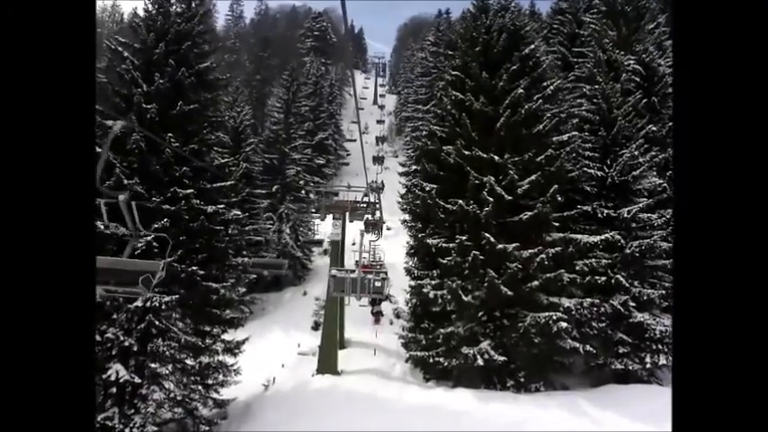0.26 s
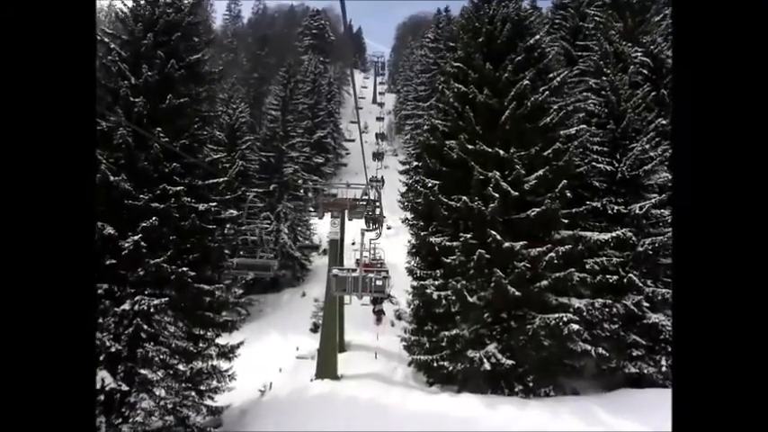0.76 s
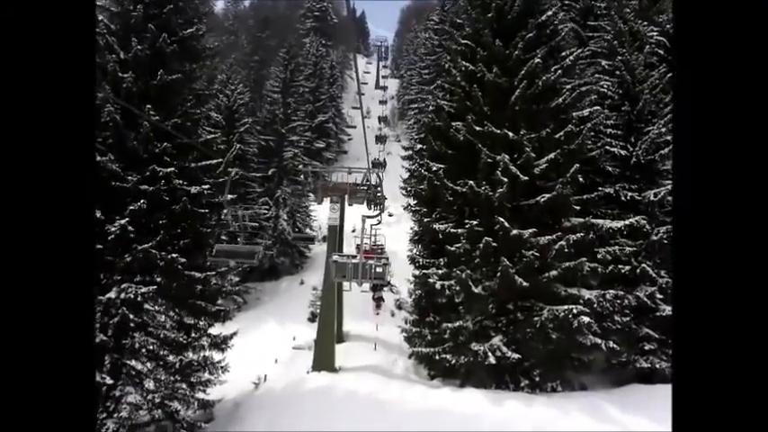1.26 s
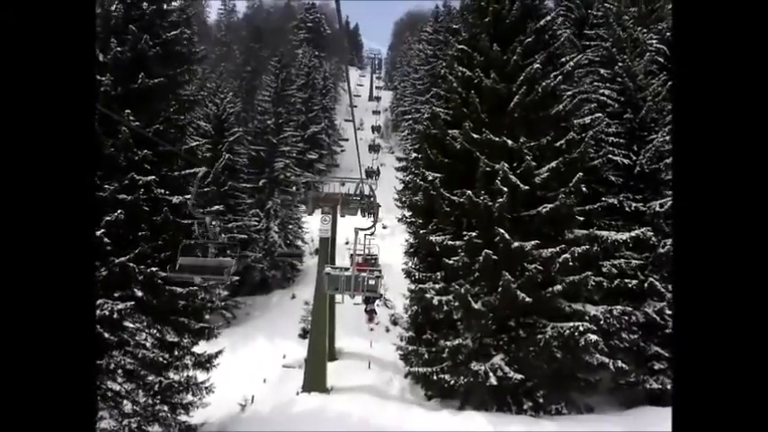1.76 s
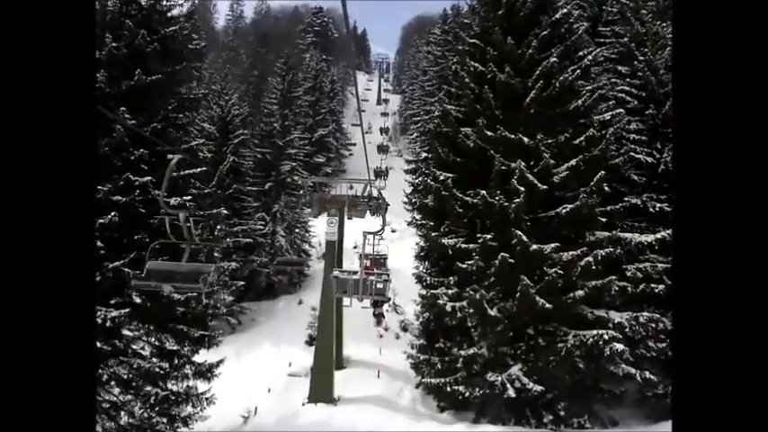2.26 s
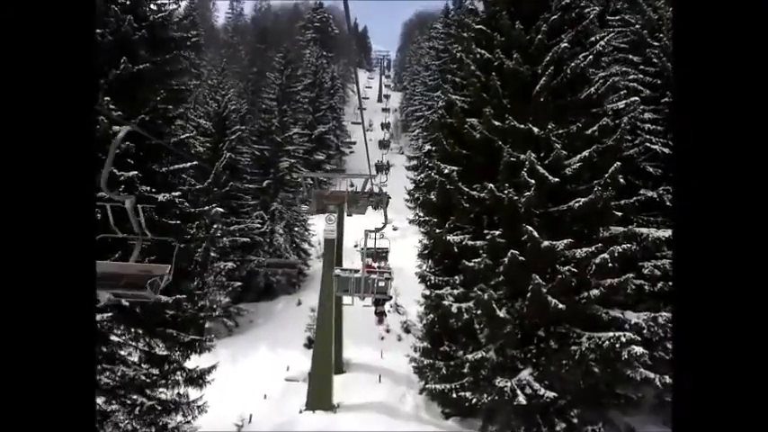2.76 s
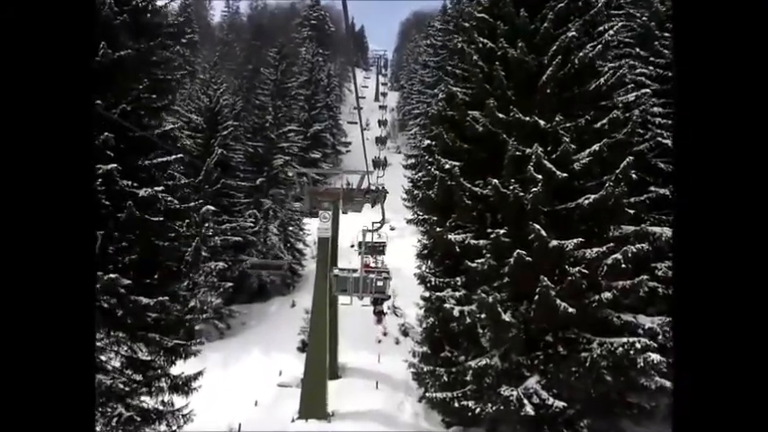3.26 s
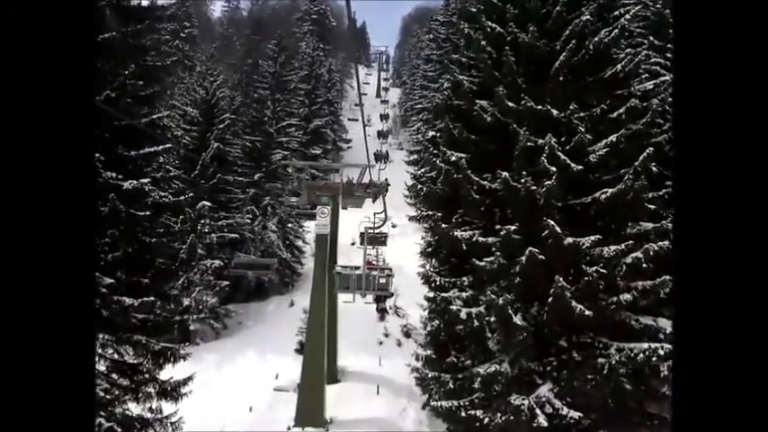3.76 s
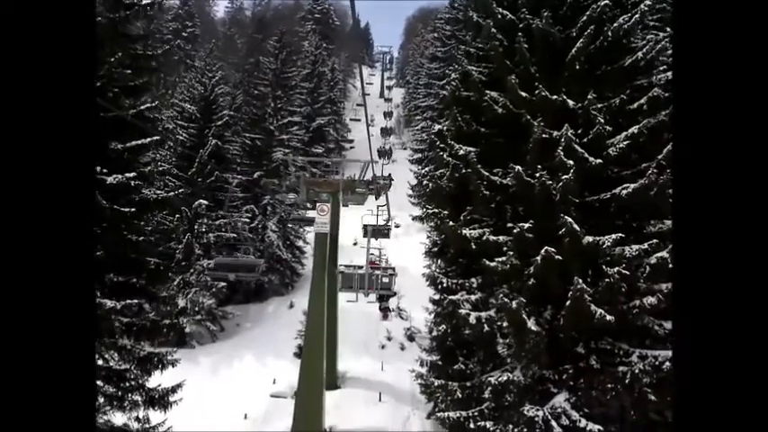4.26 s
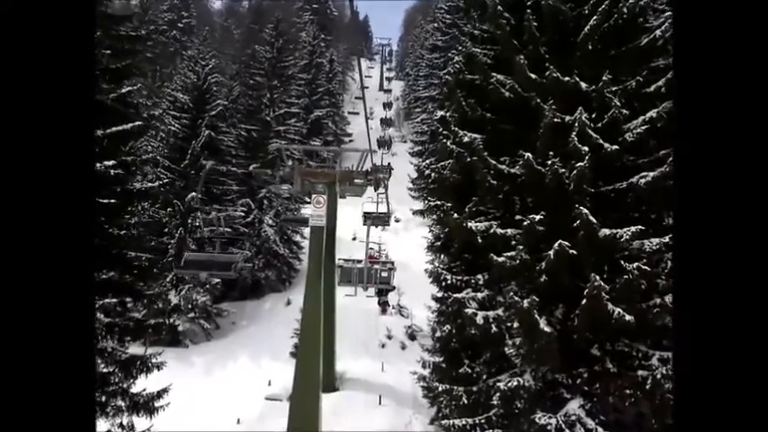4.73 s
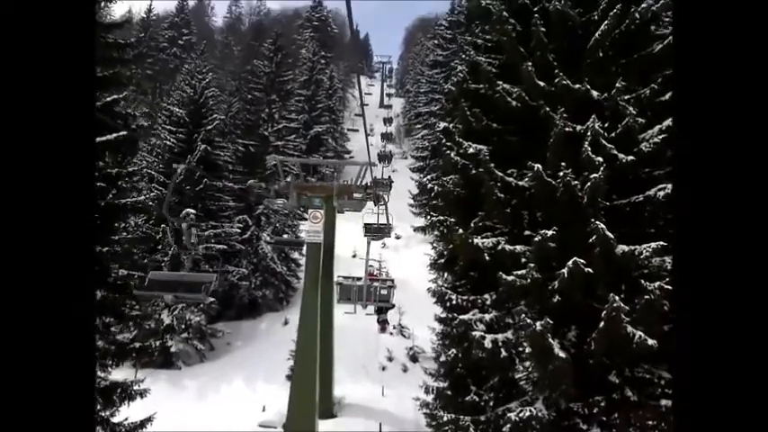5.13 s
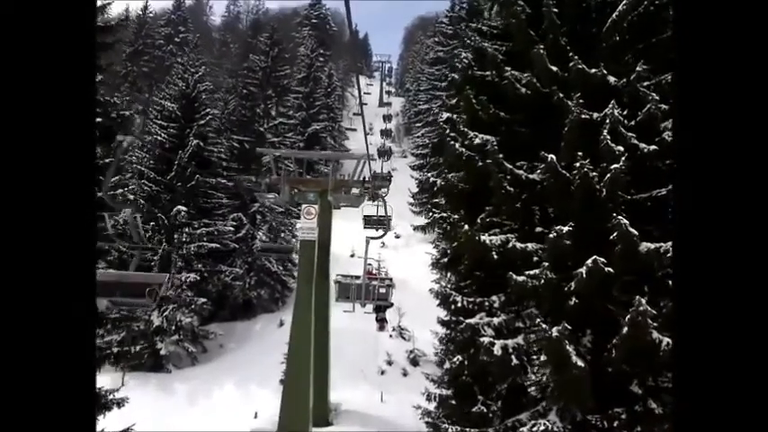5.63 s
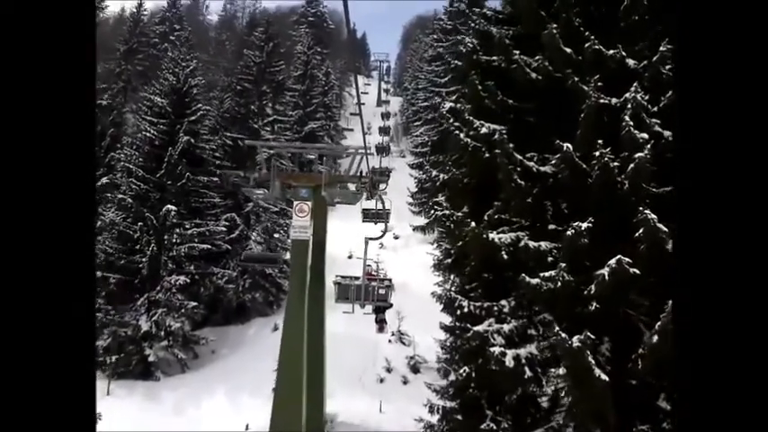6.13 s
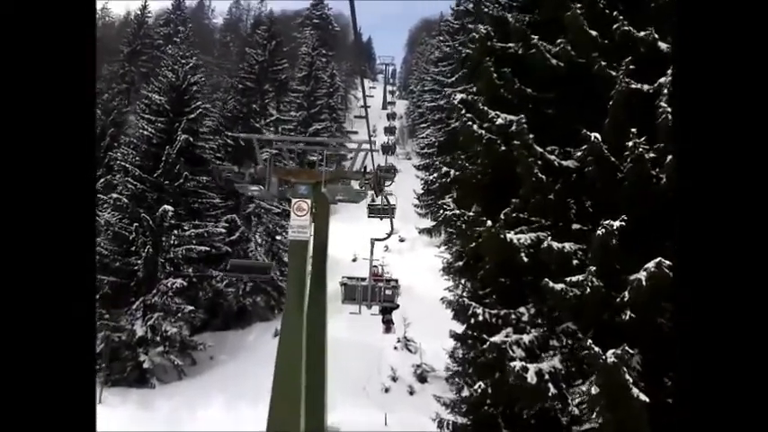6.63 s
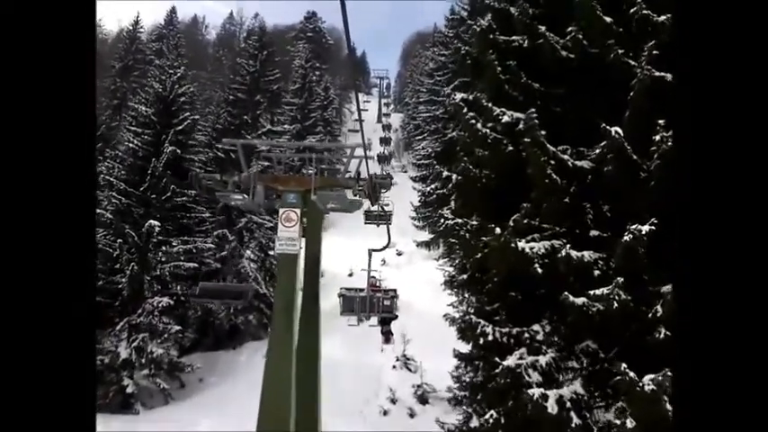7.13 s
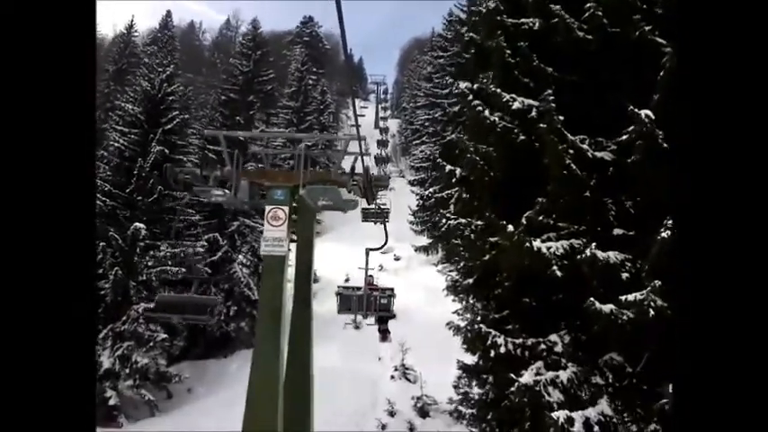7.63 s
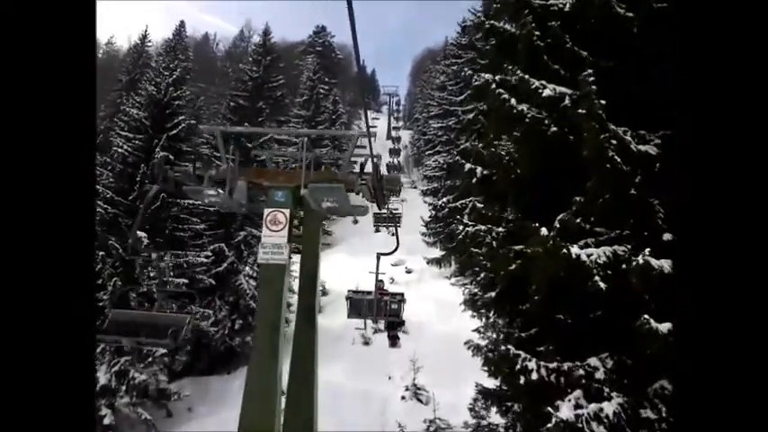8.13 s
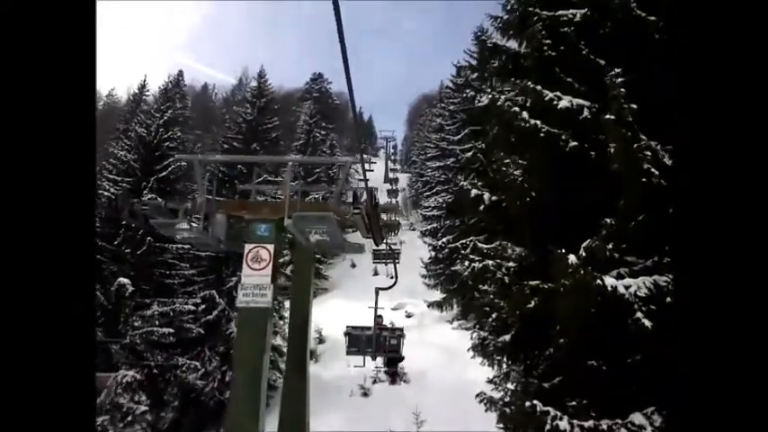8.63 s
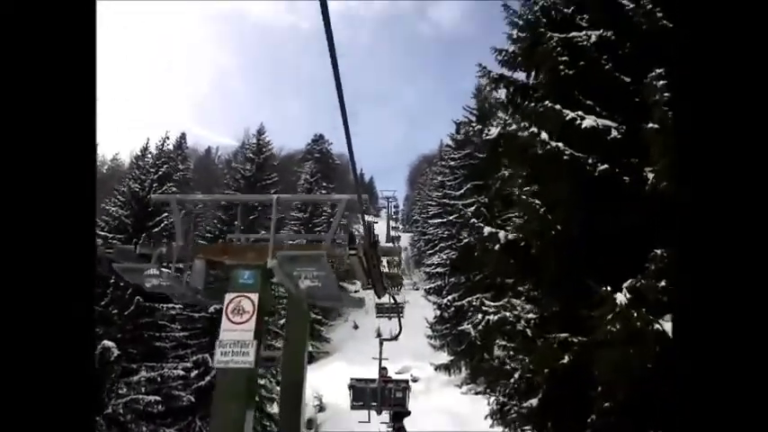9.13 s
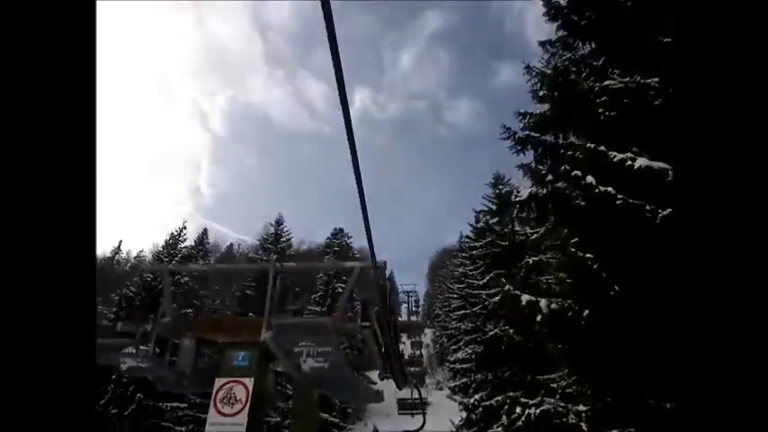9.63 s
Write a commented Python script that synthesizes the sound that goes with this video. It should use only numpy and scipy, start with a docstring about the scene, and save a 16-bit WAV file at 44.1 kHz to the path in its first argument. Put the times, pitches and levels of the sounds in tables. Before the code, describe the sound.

A chairlift ride outdoors, heard in stereo from the chair. After a quiet start, low wind rumble rises at about 0.5 seconds and loose steel parts begin knocking and chattering, four or five beats a second, slightly to the left. At 1.3 seconds a plastic catch snaps once, loud and close. A second run of clatter lasts from 2 to nearly 4 seconds, with faint, thin squeaks in both runs. Underneath, a low cable hum swells and sinks.

From 4 to 6 seconds the rattle drops away, leaving hum, rumble and a few soft thuds. At about 6 seconds, as a tower nears, the clatter returns louder and brighter, fast and even, with dull blows in the chair frame and small pings along the cable. Hum and rumble grow stronger too. The rattle thins after 9.3 seconds, while the hum and rumble carry on to about 10 seconds.

```python
"""Loose steel in a chairlift's running gear, heard from the chair in snowy forest, closing in on a tower.
The parts chatter and knock in short runs, once every turn of a sheave, and send pings along the rope.
The rope's strands drum a swelling hum through the chair, over wind and rumble. Something squeaks thinly,
and a catch snaps once, close to the stereo microphone."""
import sys
import numpy as np
from scipy import signal
from scipy.io import wavfile
from scipy.ndimage import uniform_filter1d

SR = 44100
rng = np.random.default_rng(int(sys.argv[2]) if len(sys.argv) > 2 else 0)


def to_wav(sig):
    """Store sig (one row per channel, or 1-D mono) as 16-bit WAV at the path in sys.argv[1].

    Samples outside -1..1 are clipped; the rate is SR.
    """
    pcm = np.clip(np.atleast_2d(sig), -1, 1) * 32767
    pcm = np.round(pcm).astype(np.int16)
    wavfile.write(sys.argv[1], SR, pcm.T)  # frames by channels


N = 436149

# Table levels are relative, ahead of each source's own gains.
# sheave turns that knock: (main knock [s], lead-in [dB], main [dB], rebound [dB], rebound delay [ms])
SHEAVE_TURNS = [(0.465, -54, -45, -54, 29), (0.6827, -48, -34.5, -42, 39), (0.905, -47, -41, -80, 44),
                (1.1222, -65, -34.5, -50, 54), (2.001, -55, -33, -43, 35), (2.216, -39.5, -33.5, -40.5, 61),
                (2.4349, -38, -32, -38, 25), (2.654, -39.5, -29.5, -38.5, 32), (2.873, -38, -35, -32.5, 30),
                (3.087, -34, -42, -39.5, 31), (6.1774, -36.5, -26, -23.5, 34.6),
                (6.4024, -34, -22.5, -22.5, 35.5), (6.626, -25.5, -18.5, -27, 28),
                (6.8473, -25, -19, -31, 30.4), (7.0688, -29, -21, -26, 31), (7.2902, -26, -20.5, -26.5, 30),
                (7.511, -35, -26.5, -33.5, 37), (7.7339, -31, -23, -36, 42),
                (7.955, -28, -25.5, -27.5, 37.5), (8.1755, -26, -24, -35, 30),
                (8.399, -24.5, -24.5, -35, 29), (8.62, -26.5, -24, -35, 30.5),
                (8.84, -28.5, -23.5, -28, 31), (9.056, -24, -19.5, -26, 34), (9.276, -26.5, -30, -41, 34)]
# larger, lower parts lead at first, small ones near the tower:
# (time [s], tilt of the middle modes [dB per octave], level of the part near 5.9 kHz [dB])
PART_BALANCE = [(3.9, -10, -8), (5.8, -10.5, -11), (6.2, -8, 1.5), (8.6, 1, 5), (9.1, 0.5, -7)]
# rope hum: (time [s], fundamental [dB], overtones [dB], swell swing [dB]; negative swells off the beat)
HUM_LEVELS = [(0.0, -94, -57, -10), (0.68, -59, -71, 10), (1.62, -44.5, -46, 0.5), (2.27, -37, -76.5, 3.5),
              (3.0, -61, -53, 15.5), (3.63, -40.5, -48, 2), (4.9, -41, -44, 8), (5.6, -42, -44.5, 6.5),
              (6.15, -45, -42.5, -5), (6.3, -29.5, -45, -8), (6.9, -30.5, -44.5, 2.5),
              (7.6, -32.5, -41, -5.5), (8.89, -32.5, -42, -2.5), (9.48, -30.5, -35.5, 6),
              (9.9, -41, -43.5, -12)]


def steel():
    """Contacts, knocks and thuds ring the same loose steel parts, each in its own direction."""
    modes = [(460, -24, 0.1), (621, -17, 0.035), (740, -19, 0.035), (1016, -16.5, 0.036), (1370, -9, 0.066),
             (1487, -9, 0.029), (1850, -12, 0.014), (2800, -9, 0.025), (3060, -3, 0.012), (3186, -3, 0.045),
             (3310, -2, 0.035), (3480, -5, 0.035), (3586, -16, 0.2), (3754, -13, 0.14), (4882, -28, 0.2),
             (3910, -4, 0.03), (4012, -4, 0.04), (4100, 2, 0.008), (4545, -5, 0.011), (4800, -9, 0.015),
             (5346, -5, 0.007), (5810, -1, 0.008), (7370, -12, 0.0072), (10200, -28, 0.024),
             (12200, -38, .01)]  # ringing parts: (frequency [Hz], level [dB], t60 [s])
    pan = [(500, 4.5), (1500, 1.5), (3500, 2.5), (5600, 11), (8000, 5.5), (12000, -9.5)]  # their place in the image: (frequency [Hz], left minus right [dB])
    thuds = [(1.108, -25), (1.85, -28.5), (2.047, -23.5), (2.267, -22.5), (2.48, -22.5), (4.058, -40),
             (4.366, -33.5), (4.438, -37.5), (4.505, -34.5), (4.57, -34), (5.489, -31), (6.139, -22.5),
             (6.276, -18.5), (7.233, -15.5)]  # dull blows in the frame: (time [s], peak [dB])
    low_drive, mid_drive, high_drive = contacts()
    thud_drive = amp(-16.5) * dying(spikes(*np.transpose(thuds)), t60=.044)
    tilt_db, near_db = in_time(PART_BALANCE)
    sizzle_db = 8 * np.exp(-((np.arange(N) / SR - 7.9) / .32) ** 2)  # the very top swells once
    roughness = rng.standard_normal(N) * amp(3.34 * drift(8.2))  # which part is struck most keeps changing
    out = np.zeros((2, N))
    for (hz, mode_db, t60), (shift, lag) in zip(modes, rng.random((len(modes), 2))):
        if hz > 4550:
            drive = high_drive
        elif hz < 2200:
            drive = low_drive + thud_drive * (600 / hz) ** 1.68
        else:
            drive = mid_drive * amp(tilt_db * np.log2(hz / 3600))
        if 5600 < hz < 6200:
            drive = drive * amp(near_db)
        if hz > 9000:
            drive = drive * amp(sizzle_db)
        ringing = amp(mode_db) * ring(drive * np.roll(roughness, int(shift * N)), hz, t60)
        out += at_ports(ringing, pan_db=at_hz(pan, hz), lag_ms=.2 * lag)
    # the pitch slides as the parts load and unload
    position = np.arange(N) + np.cumsum(.0025 * signal.detrend(drift(25)))
    out = np.array([np.interp(position, np.arange(N), port) for port in out])
    # a dip near 2.2 kHz hollows the rattle between its low and high rings
    out -= .55 * filtered(out, 1, [1900, 2600], "band")
    return filtered(out, 2, 9000)  # rounded contacts carry little top


def contacts(per_s=2500, spread_db=5):
    """Dense small contacts and crackling knocks: the force on the low, middle and high steel modes."""
    level = amp(-21.5) * chatter_level()
    s, peak_db, bright_db = knocks()
    bright = spikes(s, peak_db + bright_db + 10)
    touches = rng.random(N) < per_s * amp(4 * drift(30)) / SR
    grit = touches * amp(spread_db * np.minimum(rng.exponential(1, N), 4))
    crackle = amp(-14) * softened(dying(spikes(s, peak_db), t60=.015))
    tick = amp(-15.5) * softened(dying(bright, t60=.009))
    # small bright parts sink between knocks and shiver on after a hard one
    shiver = amp(-6 + 4 * turn_wave()) * level + amp(-46.5) * dying(bright, t60=.22)
    return grit * level + amp(-2.5) * crackle, grit * level + crackle, grit * shiver + tick


def knocks(lead_s=.037):
    """Five strikes a knocking turn, plus off-beat ones: (time [s], peak [dB], brightness [dB])."""
    offbeats = [(3.2048, -29, -27), (3.435, -35, 0.5), (3.648, -37, -35), (3.7103, -35, 0), (5.89, -36, -3),
                (6.2776, -29.5, -6), (6.972, -36.5, -25), (7.4099, -32.5, -1.5), (7.6175, -26, -8.5),
                (7.817, -41, -20), (7.835, -28, -2.5), (7.912, -34, -5), (8.036, -34, -8),
                (8.053, -24, -3.5), (8.074, -34, -5), (8.086, -27, -0.5), (8.259, -30.5, -10),
                (8.272, -27.5, -2), (8.963, -29.5, -30), (9.182, -35, -30), (9.402, -36, -32),
                (9.515, -35.5, -34), (9.713, -44, -17), (9.795, -39.5, -22)]  # knocks off the beat: (time [s], peak [dB], brightness [dB])
    # lead-in, its second strike, dull graze, main knock and rebound: (brightness [dB])
    brightness = [-12, -19.5, -11, -5, 0]
    strikes = []
    for s, lead_db, main_db, rebound_db, rebound_ms in SHEAVE_TURNS:
        times = [s - lead_s, s - lead_s + .008, s - .006, s, s + rebound_ms / 1000]
        peaks_db = [lead_db, lead_db - 2.5, lead_db - 3, main_db, rebound_db]
        strikes += zip(times, peaks_db, brightness)
    return np.transpose(strikes + offbeats)


def chatter_level():
    """Gain of the chatter: it swings once a turn, and lone swishes rise out of the lulls."""
    # loose steel: (time [s], level [dB], swing [dB]; positive peaks with the main knock)
    chatter = [(0.0, -88, 4), (0.3, -78, 4), (0.46, -48.5, -4.5), (1.25, -44.5, 0.5), (1.4, -51.5, -5),
               (1.71, -48, -2.5), (1.8, -58.5, -7), (1.89, -39.5, -0.5), (2.46, -48, 2.5),
               (3.12, -44.5, -5.5), (3.24, -31.5, 10.5), (3.36, -52, -20.5), (3.53, -60.5, 6.5),
               (3.65, -44, -8), (3.86, -48, -1), (3.98, -87, 1), (5.8, -75, 1.5), (5.87, -52.5, -8),
               (6.08, -41.5, -2.5), (6.6, -37, 2), (7.0, -47, -0.5), (7.4, -38.5, -0.5), (8.2, -36.5, 1),
               (8.7, -41.5, 4), (9.57, -42.5, -4.5), (9.7, -80, 1), (9.9, -87, 12)]
    swishes = [(4.03, -65), (4.2, -62.5), (4.85, -53.5), (5.479, -54), (9.76, -54), (9.85, -51)]  # brief flurries of chatter: (time [s], peak [dB])
    rise_db_per_s, fade_db_per_s = 167, 502
    t = np.arange(N) / SR
    level_db, swing_db = in_time(chatter)
    level = amp(level_db + swing_db * turn_wave())
    for s, peak_db in swishes:
        level += amp(peak_db - np.maximum(rise_db_per_s * (s - t), fade_db_per_s * (t - s)))
    return level


def turn_wave(turn_s=.22):
    """The sheave's rotation, as a cosine that peaks with each main knock."""
    s = np.array(SHEAVE_TURNS)[:, 0]
    s = np.r_[s[0] - 5 * turn_s, s, s[-1] + 5 * turn_s]
    turn_count = np.r_[0, np.cumsum(np.round(np.diff(s) / turn_s))]
    return np.cos(2 * np.pi * np.interp(np.arange(N) / SR, s, turn_count))


def pings(top_hz=5000, travel_s=.008, strays_per_s=9):
    """High bending waves run faster along the rope, so each blow or knock arrives as a falling ping."""
    blows = [(5.938, -40), (6.087, -35), (6.309, -32.5), (6.532, -33), (6.754, -35.5), (6.973, -39.5),
             (7.403, -32), (7.624, -32), (7.845, -28.5), (8.068, -29.5), (8.286, -30.5), (8.523, -37),
             (8.743, -39.5), (9.183, -37)]  # distant blows on the rope: (time [s], peak [dB])
    paths = [(0, -9, 1.5), (8.5, 0.5, 1.0), (20, -2, 1.2)]  # routes to the chair: (delay [ms], level [dB], distance [ratio])
    t, out = np.arange(round(.04 * SR)) / SR, np.zeros(N)
    s, peak_db, _ = knocks()
    clicks = spikes(*np.transpose(blows)) + spikes(s, peak_db - 16)
    _, near_db = in_time(PART_BALANCE)
    stray_level = amp(near_db - 2) * chatter_level()  # small stray blows, stronger near the tower
    fade = np.hanning(2 * len(t))[len(t):] ** 2
    for delay_ms, path_db, distance in paths:
        travel = travel_s * distance
        sweep = np.sin(2 * np.pi * top_hz * travel ** 2 / (travel + t)) * fade
        strand_blur = rms_one(uniform_filter1d(rng.standard_normal(len(t)), size=40))
        strays = (rng.random(N) < strays_per_s / SR) * rng.random(N) * stray_level
        arrivals = amp(path_db) * np.roll(clicks, round(delay_ms * SR / 1000)) + strays
        out += signal.oaconvolve(arrivals, sweep * (1 + .75 * strand_blur))[:N]
    return at_ports(filtered(out, 2, [450, 3200], "band"), pan_db=0)  # the middle waves carry most


def rope_hum(strand_hz=49.27, wander=.0162):
    """Strands cross the sheaves at a nearly steady rate; each partial swells and flickers."""
    overtones = [(2, -2.5), (3, -3), (4, -15.5)]  # harmonics of the strand rate: (multiple, level [dB])
    fundamental_db, overtones_db, _ = in_time(HUM_LEVELS)
    swell_db = swell()
    phase = 2 * np.pi * np.cumsum(strand_hz * (1 + wander * drift(3.306))) / SR
    hum = amp(fundamental_db + swell_db + 2.36 * drift(13)) * np.sin(phase)
    for multiple, level_db in overtones:
        gain = amp(overtones_db + .35 * swell_db + level_db + 3.83 * drift(10.6))
        hum += gain * np.sin(multiple * phase + rng.uniform(0, 2 * np.pi))
    return at_ports(np.sqrt(2) * amp(dips()) * hum, pan_db=2.2)


def swell(period_s=.648, crest_s=3.625, abruptness=1.8):
    """The hum comes and goes at a steady pace [dB]."""
    _, _, swing_db = in_time(HUM_LEVELS)
    wave = np.cos(2 * np.pi * (np.arange(N) / SR - crest_s) / period_s)
    return swing_db * np.tanh(abruptness * wave) / np.tanh(abruptness)


def dips(width_s=.066):
    """The level dips briefly and smoothly [dB]."""
    dropouts = [(3.95, 4), (4.41, 16.5), (5.17, 11.5), (5.63, 9.5), (5.98, 17)]  # gaps in the hum: (time [s], depth [dB])
    t = np.arange(N) / SR
    return -sum(depth_db * np.exp(-((t - s) / width_s) ** 2) for s, depth_db in dropouts)


def snap():
    """Three quick cracks ring a small stiff plastic catch, close by on the right; it bounces once."""
    hits = [(1.3157, -.5, -1.5), (1.3413, -21, -32)]  # the snap and its bounce: (time [s], left [dB], right [dB])
    modes = [(780, -7, .013), (1350, -8, .007), (2800, -10, .004), (5200, -3.5, .005), (8500, -14, .003),
             (13000, -20, .003)]  # ringing of the catch: (frequency [Hz], level [dB], t60 [s])
    out = np.zeros((2, N))
    for s, left_db, right_db in hits:
        cracks = np.zeros(N)
        cracks[round(s * SR) + np.array([-16, 0, 9])] = [-.35, 1, -.4]
        for k, (hz, mode_db, t60) in enumerate(modes):
            ringing = amp(mode_db) * ring(cracks, hz, t60)
            # the lowest mode reaches both ports at once
            heard = at_ports(ringing, pan_db=0, lag_ms=.55) if k else np.roll(ringing, 16)
            out += heard * amp([[left_db], [right_db]])
    return out


def squeaks(hz=7630, width_hz=110, length_s=.07):
    """A rubbing part sings in short, narrow bands of noise, a little to the left."""
    rubs = [(0.597, -52), (0.7976, -53), (1.246, -49), (1.47, -64), (2.5875, -56), (2.8245, -53),
            (3.0294, -57), (3.4665, -53), (6.33, -46), (7.1901, -51)]  # single squeaks: (time [s], peak [dB])
    t, envelope = np.arange(N) / SR, np.zeros(N)
    for s, peak_db in rubs:
        envelope += amp(peak_db) * np.sin(np.pi * np.clip((t - s) / length_s + .31, 0, 1))
    tone = ring(rng.standard_normal(N), hz, t60=np.log(1000) / (np.pi * width_hz))
    return at_ports(envelope * rms_one(tone), pan_db=3)


def rumble():
    """Wind and shaking in the bass, the chair frame droning above it."""
    levels = [(0.0, -57.5, -66.5), (0.3, -62, -61), (0.51, -50.5, -47), (1.62, -49, -48), (1.9, -48.5, -60),
              (2.15, -45, -46), (3.66, -51, -45.5), (4.2, -52.5, -57.5), (5.05, -54.5, -61.5),
              (5.19, -55.5, -66.5), (5.49, -53.5, -56), (5.9, -50, -54), (6.3, -39, -40), (7.17, -42, -50),
              (8.41, -40, -37), (8.77, -37.5, -45), (9.9, -39.5, -44.5)]  # course of the ride: (time [s], deep rumble [dB], frame drone [dB])
    deep_spectrum = [(20, -21), (35, 3), (70, -1.5), (120, -5.5), (200, -13.5), (300, -11.5)]  # wind and shaking: (frequency [Hz], spectral density [dB])
    drone_spectrum = [(120, -16), (200, -1), (505, -3.5), (757, -0.5), (1230, -9), (1370, 4), (1620, -12.5),
                      (2400, -21), (3120, -63)]  # chair frame: (frequency [Hz], spectral density [dB])
    deep_db, drone_db = in_time(levels)
    deep = amp(deep_db + 5.5 + .24 * swell() + .27 * dips()) * banded_noise(deep_spectrum, pan_db=2)
    return deep + amp(drone_db) * banded_noise(drone_spectrum, pan_db=4)


def scatter(x, level_db=-5, t60=.16):
    """Seat, bars and rider scatter the sound into a short tail, different at each port."""
    t = np.arange(round(t60 * SR)) / SR
    tail = rng.standard_normal((2, len(t))) * amp(-60 * t / t60)
    tail /= np.sqrt(np.sum(tail ** 2, axis=1, keepdims=True))
    return amp(level_db) * signal.fftconvolve(x, tail, axes=1)[:, :N]


def banded_noise(spectrum, pan_db, flicker_db=2.5):
    """Half-octave bands of stereo noise that flicker together and singly; rms 1 before panning."""
    likeness = [(30, 0.18), (400, 0.91), (800, 0.88), (1500, 0.11), (2500, 0.077)]  # how alike the two ports hear it: (frequency [Hz], correlation [0-1])
    out, together = 0, drift(18)
    bottom_hz, top_hz = spectrum[0][0], spectrum[-1][0]
    edges = bottom_hz * 2 ** np.arange(0, np.log2(top_hz / bottom_hz) + .1, .5)
    white = rng.standard_normal((2, 2, N))
    for k, (low, high) in enumerate(zip(edges, edges[1:])):
        mid, side = filtered(white[k % 2], 2, [low, high], "band")
        hz = np.sqrt(low * high)
        alike = at_hz(likeness, hz)
        gain = amp(at_hz(spectrum, hz) + flicker_db * (.96 * together + drift(13)))
        out += gain * (np.sqrt(1 + alike) * mid + np.sqrt(1 - alike) * side * [[1], [-1]])
    return rms_one(out) * amp([[pan_db / 2], [-pan_db / 2]])


def at_ports(x, pan_db, lag_ms=.1):
    """One source at the two microphone ports: the left hears it later, and louder by pan_db."""
    return np.array([np.roll(x, round(lag_ms * SR / 1000)) * amp(pan_db / 2), x * amp(-pan_db / 2)])


def ring(clicks, hz, t60):
    """A unit click sets a sine of height 1 ringing."""
    r, w = amp(-60 / (t60 * SR)), 2 * np.pi * hz / SR
    return signal.lfilter([0, np.sin(w)], [1, -2 * r * np.cos(w), r * r], clicks + 1e-18)


def spikes(s, peak_db):
    """One spike for each event."""
    out = np.zeros(N)
    out[np.round(s * SR).astype(int)] = amp(peak_db)
    return out


def dying(x, t60):
    """Each spike falls away exponentially."""
    return signal.lfilter([1], [1, -amp(-60 / (t60 * SR))], x + 1e-18)


def softened(x, rise_s=.0004):
    """A knock takes a moment to build."""
    pole = np.exp(-1 / (rise_s * SR))
    return signal.lfilter([1 - pole], [1, -pole], x)


def drift(rate_hz):
    """Slow random wander of rms 1, drawn every 40 samples."""
    r = np.exp(-2 * np.pi * rate_hz * 40 / SR)
    slow = signal.lfilter([1], [1, -2 * r, r * r], rng.standard_normal(N // 40 + 2002))[2000:]
    return np.interp(np.arange(N) / 40, np.arange(len(slow)), rms_one(slow))


def filtered(x, order, hz, kind="low"):
    """Low-pass or band-pass."""
    return signal.sosfilt(signal.butter(order, hz, kind, fs=SR, output="sos"), x)


def in_time(rows):
    """Columns of a timed table, one value a sample."""
    s, *columns = np.transpose(rows)
    return [np.interp(np.arange(N) / SR, s, column) for column in columns]


def at_hz(points, hz):
    """Read a curve on a log frequency axis."""
    frequencies, values = np.transpose(points)
    return np.interp(np.log(hz), np.log(frequencies), values)


def amp(db):
    """dB to gain."""
    return 10 ** (np.asarray(db) / 20)


def rms_one(x):
    """Scale to rms 1."""
    return x / np.sqrt(np.mean(x ** 2) + 1e-20)


def scene():
    """The ride as it reaches the microphone on the chair."""
    gear = steel() + squeaks() + pings()
    return gear + rope_hum() + rumble() + scatter(gear) + snap()


def record(dry, ceiling=.93, cutoff_hz=15900):
    """The microphone adds faint hiss; the recorder rounds the highest peaks and cuts the top."""
    hiss = amp(-68) * filtered(rng.standard_normal(dry.shape), 1, 9050)
    x = (dry + hiss) / ceiling
    rounded = ceiling * x / (1 + x ** 6) ** (1 / 6)
    return signal.sosfilt(signal.cheby2(12, 70, cutoff_hz, fs=SR, output="sos"), rounded)


dry = scene()
out = record(dry)
to_wav(out)
```